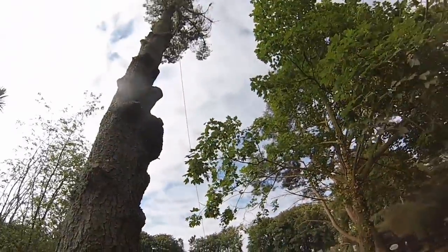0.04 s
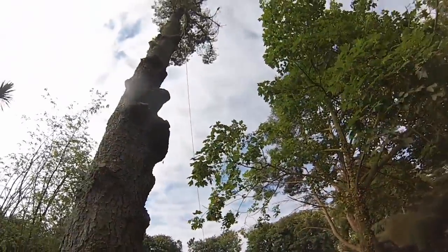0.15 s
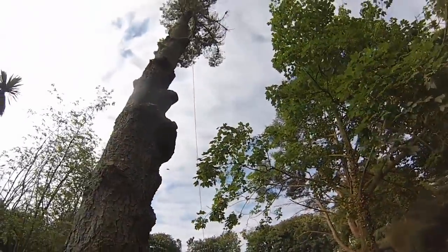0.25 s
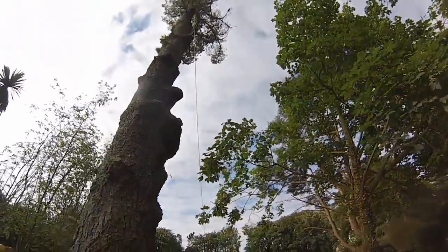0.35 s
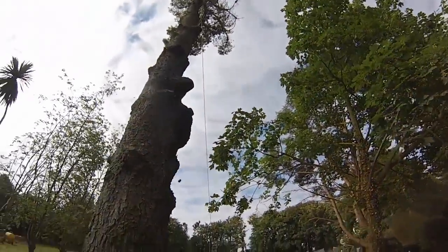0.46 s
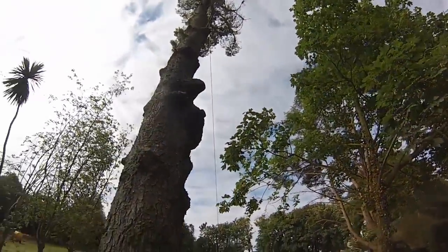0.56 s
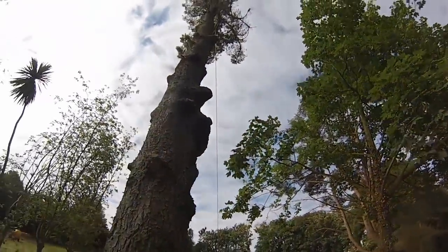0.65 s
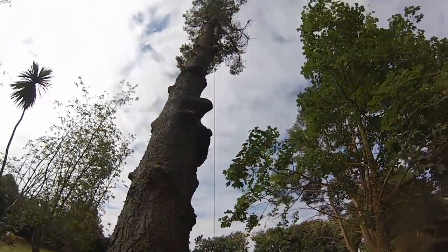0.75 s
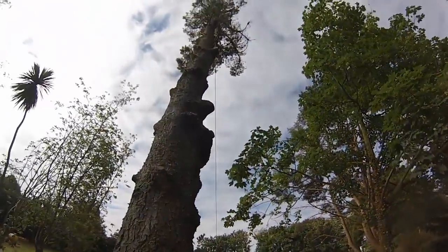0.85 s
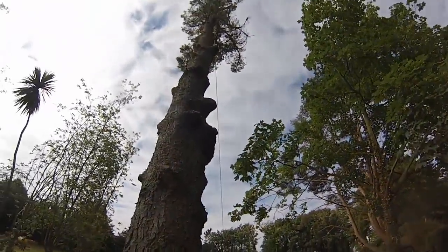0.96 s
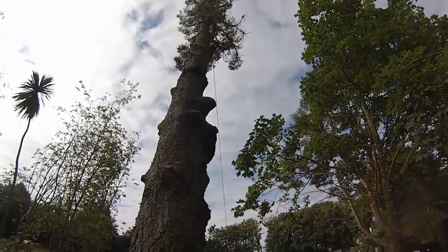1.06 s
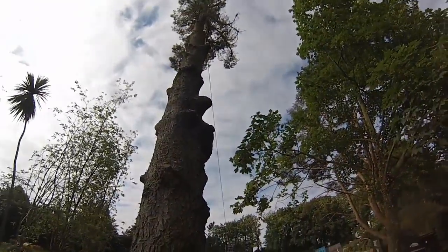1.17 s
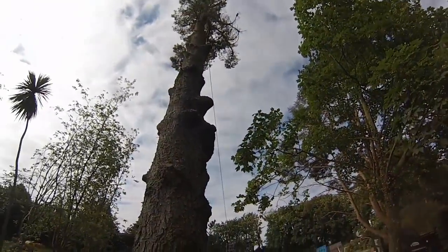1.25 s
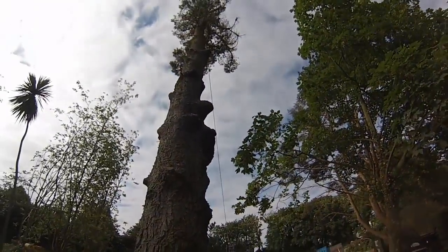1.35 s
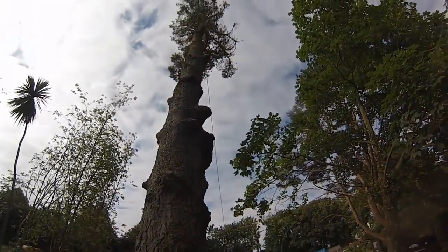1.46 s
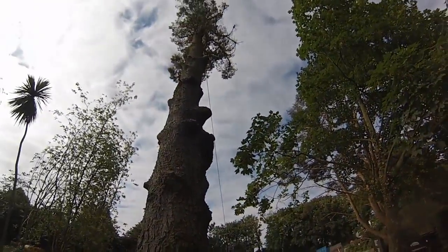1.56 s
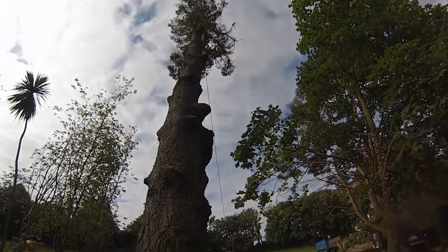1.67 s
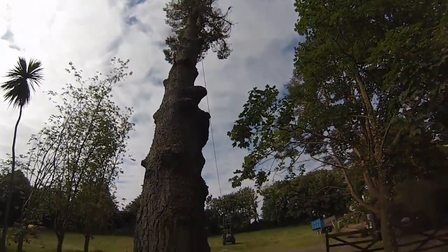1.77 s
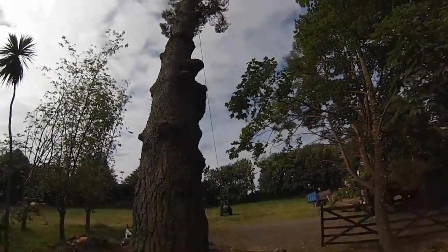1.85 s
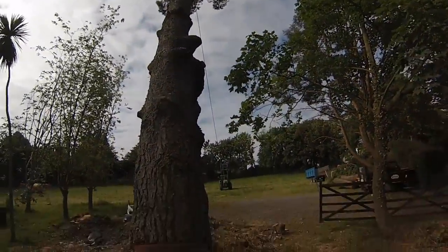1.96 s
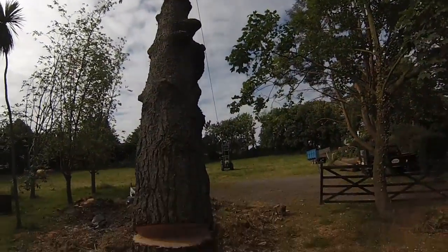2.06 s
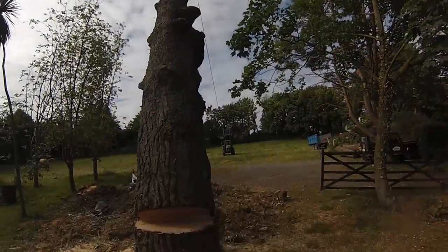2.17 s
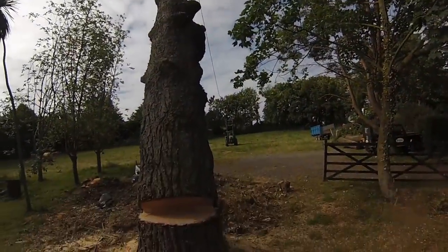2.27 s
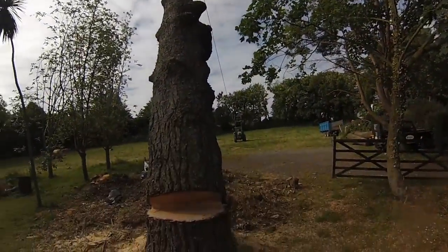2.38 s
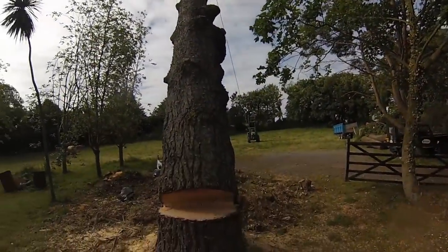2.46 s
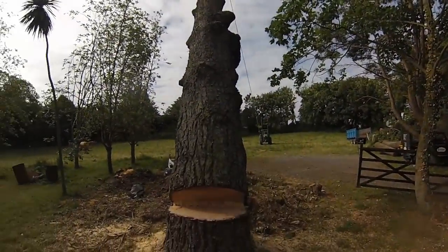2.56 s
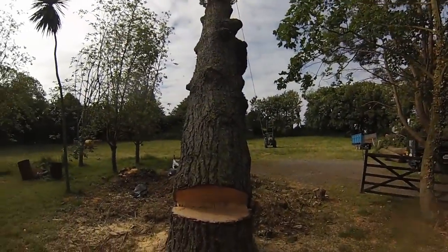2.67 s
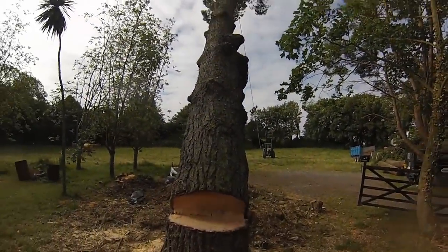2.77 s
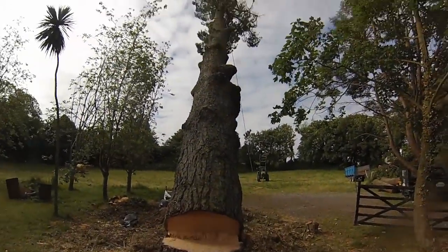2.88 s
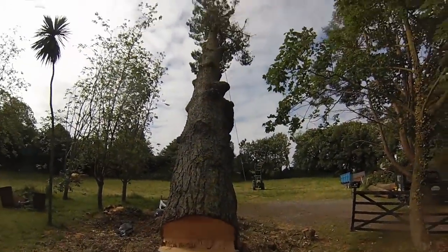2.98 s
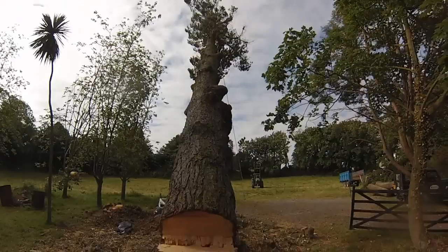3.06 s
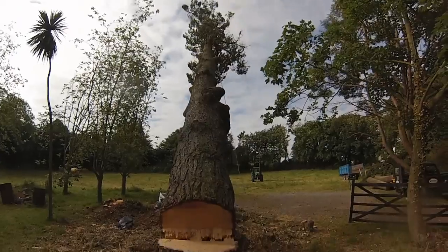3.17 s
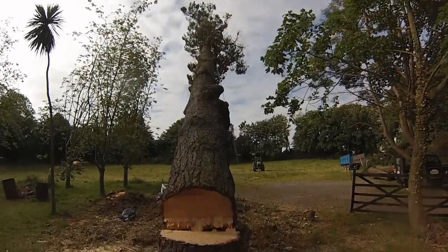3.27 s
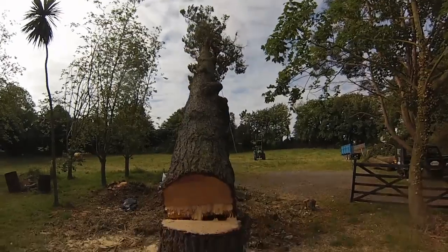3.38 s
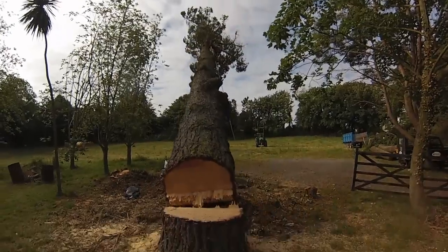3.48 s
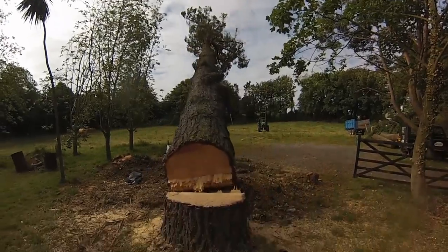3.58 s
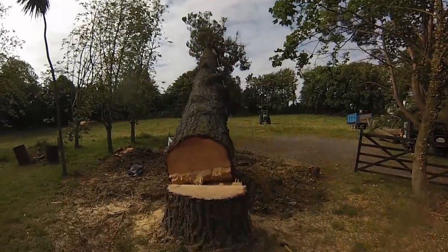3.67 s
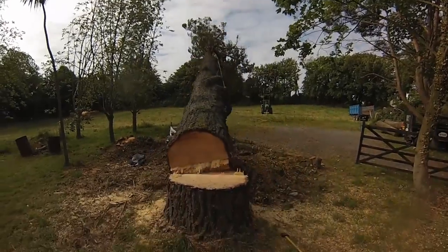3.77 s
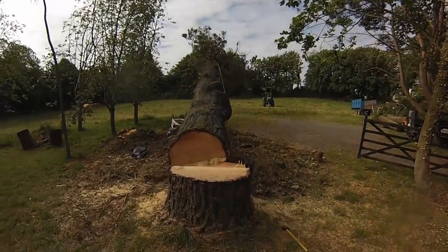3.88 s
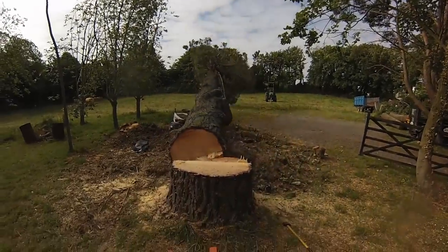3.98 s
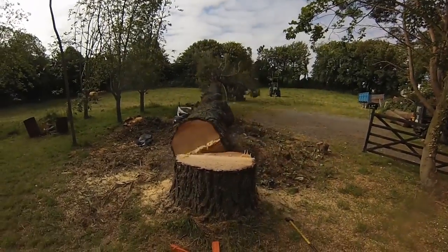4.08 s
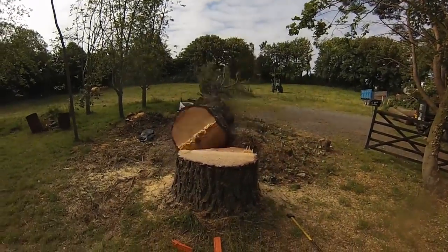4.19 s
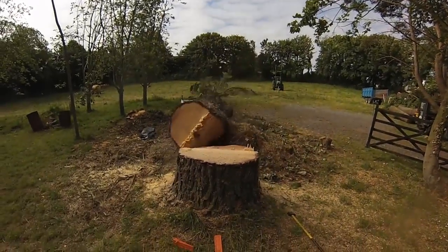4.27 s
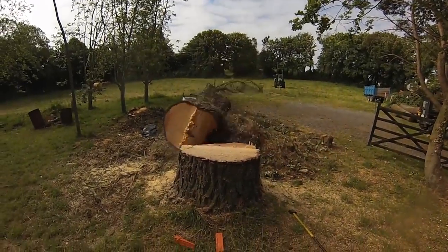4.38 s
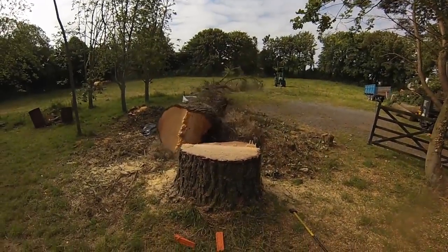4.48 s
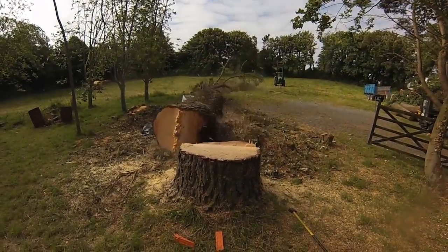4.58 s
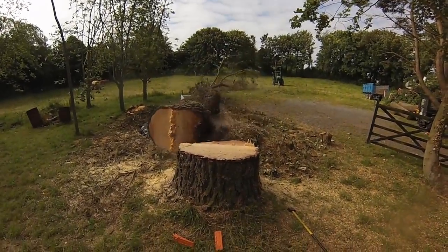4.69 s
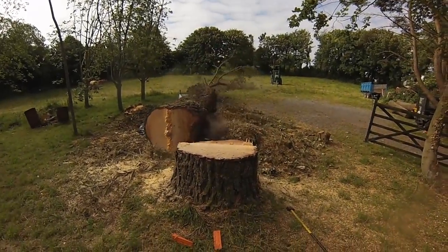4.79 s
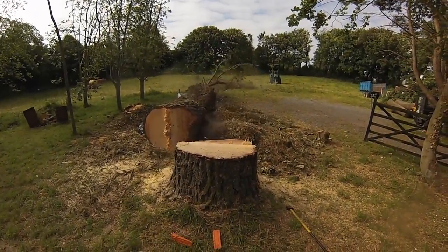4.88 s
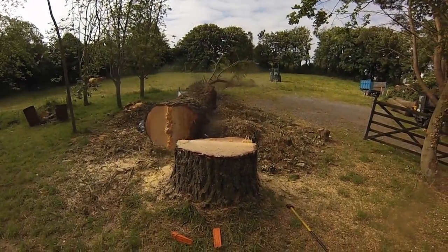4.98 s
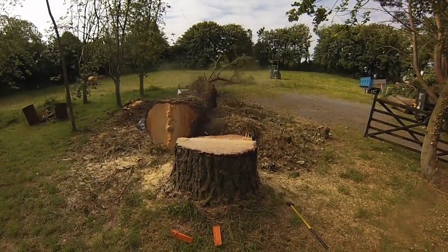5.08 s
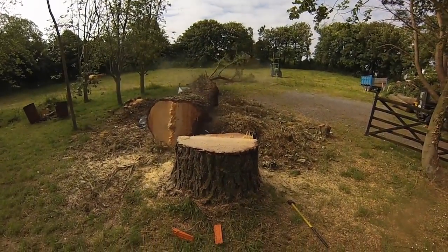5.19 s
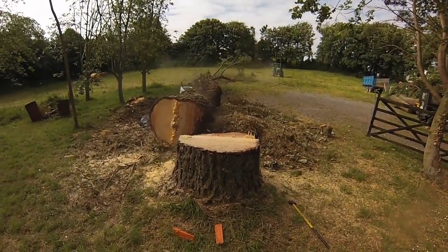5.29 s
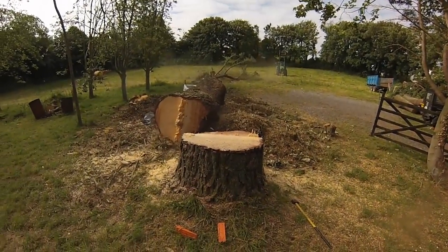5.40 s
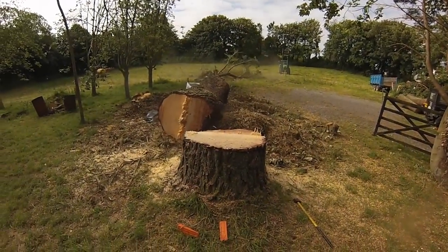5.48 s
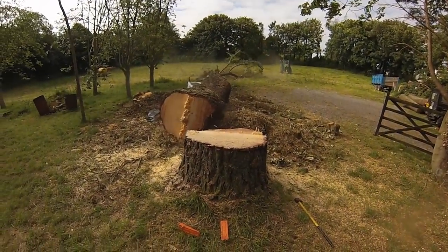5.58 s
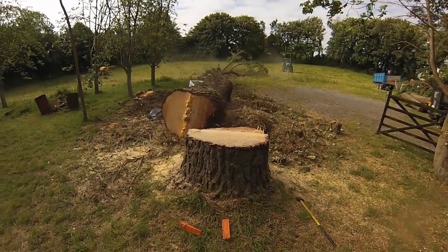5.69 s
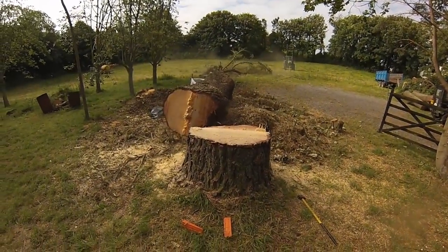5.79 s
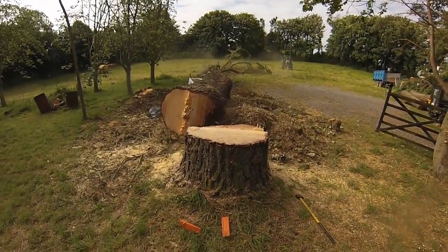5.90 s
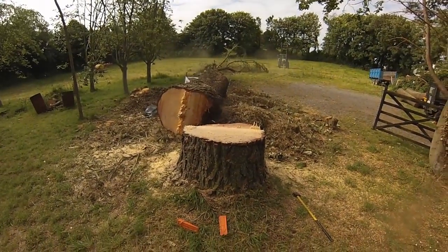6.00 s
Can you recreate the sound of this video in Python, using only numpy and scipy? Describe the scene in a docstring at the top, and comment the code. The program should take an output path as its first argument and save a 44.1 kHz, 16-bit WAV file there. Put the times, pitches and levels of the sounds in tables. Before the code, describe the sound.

Close to a large tree, thick wood cracks from the very start, hollow and sharp, the loudest ones distorting the microphone. Snaps and fibrous tearing crowd together until almost three seconds, each answered by surrounding trees. A far tractor drones, slows and eases off. After a thinner moment the last strands break, then trunk and limbs thud down in a swelling crunch of twigs, settling into faint snaps and a rustle.

```python
"""A tractor pulls steadily far off: wavering firing tones and pulsed clatter, in faint outdoor air (filtered noise).
From the start the hinge of a big conifer snaps and tears: damped knocks, ticks and filtered random grains, with
a few low bumps. The surrounding trees throw each crack back; the loudest clip. The tractor slows, then eases off.
The last strands break at about 3.9 s; trunk and limbs thud down and the crown crushes twigs: swelling grain
noise and knocks. The debris settles with a few faint snaps, and a last bough rustles faintly."""
import sys
import numpy as np
from scipy import signal
from scipy.fft import rfft, irfft, next_fast_len
from scipy.io import wavfile
from scipy.ndimage import uniform_filter1d

SR = 44100
rng = np.random.default_rng(int(sys.argv[2]) if len(sys.argv) > 2 else 0)


def transcribe(u):
    """Save the signal u as a 16-bit wav file named by the first command-line argument.

    u: samples, shape (n,) or (channels, n), limited to [-1, 1]; the rate is SR.
    q: integer samples, one column per channel.
    """
    v = np.clip(np.atleast_2d(u).T, -1, 1)
    q = np.round(v * 32767).astype(np.int16)
    wavfile.write(sys.argv[1], SR, q)


N = 266452
LENGTH = next_fast_len(N + SR)  # a spare second holds the tails
TIME = np.arange(LENGTH) / SR

# Single wood snaps, loud and faint, hinge first, branches last:
# (time [s], knock peak [dB], pitch [Hz], tick re knock before the tick trim [dB], damping [1]: low rings, high is dead)
SNAP_EVENTS = [(-.035, 7.5, 612, -8.5, 1.13), (.021, -28, 1010, 7.5, 1.5),
               (0.3817, -17.5, 686, -11.5, 0.93), (0.5044, -12, 680, -15, 0.97), (.643, 1, 640, -15, 1.11),
               (0.7124, -2, 762, -14.5, 0.87), (0.7507, -12.5, 707, -25, .9), (0.804, -20.5, 922, -28, 1.5),
               (.864, -18.5, 1970, -14.5, 1.5), (1.187, -16, 987, -16.5, 0.81),
               (1.1931, -8.5, 837, -23.5, 0.74), (1.2237, 9.5, 644, -18, 1.3),
               (1.42, -11.5, 1020, -21.5, 0.68), (1.4787, -17, 1314, -15.5, 1.8),
               (1.499, 5.5, 732, -21.5, 0.68), (1.5044, -6, 662, -28.5, 0.69),
               (1.5419, -4.5, 786, -38, 0.83), (1.6576, -17, 931, -18.5, 0.85), (1.7044, -4, 930, -26, 1.2),
               (1.7134, -15, 993, -21, 1.3), (1.788, -16, 1241, -14, 1.4), (1.796, 12.5, 414, -8, 1.54),
               (1.889, -9, 800, -30, 0.87), (1.927, -14, 1197, -15, 1.1), (1.9413, -10, 1192, -26.5, 1.24),
               (2.0403, -15, 988, -10.5, 1.1), (2.0869, -2.5, 665, -24, 1.5),
               (2.1002, 0, 776.4, -29.5, 1.37), (2.195, -10.5, 1198, -9, 0.89),
               (2.258, -9.5, 1009, -14, 1.54), (2.308, -19, 2400, -3, 1.4), (2.3129, -3.5, 1905, -5, 1.5),
               (2.318, -9.5, 1284, -17, 0.78), (2.33, -16, 732, -18, 0.99), (2.3839, 3, 563, -6, 1.9),
               (2.406, -12.5, 1083, -17, 1), (2.4112, -10, 1110, -19, 1.2), (2.4225, 4.5, 990, -19, 1.02),
               (2.451, 8.5, 1327, -10, 0.92), (2.4798, -11.5, 938, -17.5, .7),
               (2.588, 5.5, 345, -12.5, 1.16), (2.634, -19.5, 1021, -15.5, 1.5),
               (2.6655, -16, 807, -16.5, 1.3), (2.68, -9.5, 908, -19, 1.6), (2.707, -13, 721, -14, 1.8),
               (2.764, -4.5, 635, -7, 1.67), (2.8004, -9.5, 890, -7.5, 0.64),
               (2.8066, -9.5, 820, -14, 0.61), (2.8278, 2.5, 685, -14, 1.72),
               (3.3646, -36.5, 1410, -1, 1.2), (3.8435, -18, 1010, -13, 1.1), (3.8559, -13, 725, -7, 0.99),
               (3.8819, -17, 1000, -7, 0.87), (4.178, -24.5, 3630, -19, 0.34),
               (4.883, -40.5, 3500, -10, .6), (5.426, -40.5, 1310, -1.5, 1.1)]
# Low bumps (one a wind or handling bump, one the low thump of overload), then thuds of trunk and limbs:
# (time [s], peak [dB], pitch [Hz])
BUMP_EVENTS = [(.002, -22, 258), (.63, -27.5, 102), (1.798, -25.5, 90), (4.0, -26, 116), (4.096, -23, 142),
               (4.22, -18, 930), (4.263, -25, 483), (4.284, -23, 94), (4.306, -13, 756), (4.334, -11, 247),
               (4.362, -16.5, 330), (4.378, -11, 473), (4.392, -15, 208), (4.401, -12.5, 745),
               (4.651, -26.5, 935), (4.745, -35, 830), (5.141, -40.5, 558)]
# Spells of tearing, hinge then last strands: (full level from [s], hold [s], level before layer trims [dB])
TEAR_SPELLS = [(0.647, 0.14, -39), (1.197, 0.55, -39.5), (1.899, 0.02, -32.5), (1.986, 0.52, -40.5),
               (2.646, 0.19, -34), (3.804, 0.054, -39.5)]
# Engine tones: (multiple of firing rate [1], relative level [dB])
FIRING_ORDERS = [(1, -2), (2, -7), (3, -10), (5, -12.5)]
# Dry tick of a parting fibre: (frequency [Hz], relative level [dB])
TICK_SPECTRUM = [(800, -24), (2450, 10), (4200, -2), (5400, 0), (7200, -16.5), (11000, -26.5), (16000, -50)]
# Fine splintering: (frequency [Hz], relative level [dB])
SPLINTER_SPECTRUM = [(80, -11), (300, 1), (1000, 1.5), (1500, -11.5), (2700, -10.5), (4300, -26.5),
                     (5400, -19.5), (7500, -35.5), (16000, -60)]
# Scatter off stump and ground: (frequency [Hz], relative gain [dB])
SCATTER_SPECTRUM = [(60, -2), (300, -4), (900, 6), (2000, -9)]
# Reflection off the surrounding trees: (frequency [Hz], relative gain [dB])
ECHO_SPECTRUM = [(60, -17.5), (350, -13), (560, -5), (880, 1.5), (1400, -6.5), (5300, -1.5), (8000, -6.5)]
# Rumble of the struck earth: (frequency [Hz], relative level [dB])
GROUND_SPECTRUM = [(20, -29), (40, 5), (95, 15), (145, 0), (260, 3), (470, -7), (900, -43.5)]
# Breaking branches: (frequency [Hz], relative level [dB])
BRANCH_SPECTRUM = [(120, 0), (270, 1), (620, -3), (880, 8.5), (1200, -8.5), (1700, -6), (3500, -44.5),
                   (9000, -49)]
# Crushed twigs and needles: (frequency [Hz], relative level [dB])
NEEDLE_SPECTRUM = [(900, 1), (2300, -6), (3200, -2.5), (4300, -7.5), (5500, -8), (7500, -19),
                   (11000, -23.5), (16000, -45)]
# Outdoor background: (frequency [Hz], relative level [dB])
AIR_SPECTRUM = [(25, 0), (90, -2), (220, -19.5), (550, -24), (1000, -9.5), (1900, -39.5), (5200, -31.5),
                (8500, -46.5)]

AIR_DB, TOP_HZ = -59.5, 15700
# Tractor: firing rate, level before the tone/clatter mix
PULL_HZ, PULL_DB, IDLE_HZ, IDLE_DB = 77.8, -49, 77, -60.5
EASE_OFF_S, EASE_LENGTH_S = 3.5, 1
SAG_HZ_PER_S = 2.4  # labours under load
SPEED_WANDER_RMS, HUM_WAVER_RMS = .023, .5
# Tearing; levels before layer trims
TEAR_ATTACK_S, TEAR_RELEASE_S = 0.0037, 0.048
STRAIN_DB, STRAIN_PEAK_S, STRAIN_DB_PER_S = -56, 1.2, 3  # faint crackle between spells
SPLINTER_DB, SPLINTER_S = -37, 0.03  # fibres keep parting after a crack
# Fall: butt slips off the stump, crown touches, trunk hits, debris at rest
BUTT_DOWN_S, CROWN_DOWN_S, IMPACT_S, AT_REST_S = 3.94, 4.135, 4.384, 5.7
CONTACT_S, SETTLE_DB_PER_S, REST_FADE_S = 0.019, 18, 0.26
SWAY_S, SWAY_LENGTH_S, SWAY_DB = 5.53, 0.046, 8.5  # last bough sinks and rustles
CRUNCH_DB, CRUNCH_S = -13, 0.016  # crunch re bump or thud


def undb(db):
    """Decibels to gain."""
    return 10 ** (np.asarray(db) / 20)


def unit(x):
    """Scale to rms 1."""
    return x / np.sqrt(np.mean(x ** 2))


def ramp(start_s, length_s):
    """Straight rise from 0 to 1."""
    return np.clip((TIME - start_s) / length_s, 0, 1)


def add(track, at_s, sound):
    """Mix a sound in at a time, wrapping at the ends."""
    track[(int(at_s * SR) + np.arange(len(sound))) % LENGTH] += sound


def colour(x, spectrum):
    """Causal minimum-phase filter through (Hz, dB) points, by folding the cepstrum."""
    point_hz, point_db = np.transpose(spectrum)
    hz = np.maximum(np.fft.rfftfreq(len(x), 1 / SR), 1)
    gain_db = np.interp(np.log(hz), np.log(point_hz), point_db)
    cepstrum = irfft(np.log(undb(gain_db)), len(x))
    cepstrum[1:len(x) // 2] *= 2
    cepstrum[len(x) // 2:] = 0
    return irfft(rfft(x) * np.exp(rfft(cepstrum)), len(x))


def walk(rate_hz):
    """Slow random drift, rms 1: random steps smoothed twice."""
    hold = int(SR / rate_hz)
    steps = np.repeat(rng.standard_normal(LENGTH // hold + 1), hold)
    smooth = uniform_filter1d(uniform_filter1d(steps, hold), hold)
    return unit(smooth[:LENGTH])


def grains(rate_hz, spread_db):
    """Tiny fractures at random moments, a few much larger than the rest; rms 1."""
    size = undb(spread_db * np.minimum(rng.exponential(size=LENGTH), 4))
    struck = rng.random(LENGTH) < rate_hz / SR
    return unit(struck * size * rng.choice([-1, 1], LENGTH))


def knock(hz, damping, soft_hz, size=4096):
    """Heavily damped swing, as of wood set free at once, softened above soft_hz; peak 1."""
    f = np.fft.rfftfreq(size, 1 / SR)
    s = 1j * f / hz
    resonance = (damping * s / (1 + damping * s + s * s)) ** 2
    swing = irfft(resonance / (1 + 1j * f / soft_hz) ** 2)
    return -swing / np.abs(swing).max()


def snaps(db, hz, count, damping=0.54, scatter_db=4.5):
    """Single sticks giving way at random moments, each with its own size and pitch, following a level curve."""
    out = np.zeros(LENGTH)
    for when, size, pitch in rng.random((count, 3)):
        at = int(when * N)
        gain = undb(db[at] + scatter_db * (4 * size ** 2 - 2))
        stick_hz = hz * 2 ** (3 * pitch - 1.5)
        add(out, at / SR, gain * knock(stick_hz, damping, 5000))
    return out


def air():
    """Faint outdoor background: filtered noise, gently swelling."""
    noise = colour(rng.standard_normal(LENGTH), AIR_SPECTRUM)
    return unit(noise) * undb(AIR_DB + 0.64 * walk(2.5))


def tractor(tones_db=-3.5, clatter_db=-5.0):
    """Distant diesel: firing tones and clatter pulsing with them; it slows under load, then idles quietly."""
    eased = ramp(EASE_OFF_S, EASE_LENGTH_S)
    pull_hz = (PULL_HZ - SAG_HZ_PER_S * TIME) * (1 + SPEED_WANDER_RMS * walk(4.5))
    firing_hz = pull_hz * (1 - eased) + IDLE_HZ * eased
    db = PULL_DB * (1 - eased) + IDLE_DB * eased
    phase = 2 * np.pi * np.cumsum(firing_hz) / SR
    tones = np.zeros(LENGTH)
    for order, order_db in FIRING_ORDERS:
        waver = 1 + HUM_WAVER_RMS * walk(3.8)
        tones += undb(order_db) * waver * np.sin(order * phase + 2 * np.pi * rng.random())
    pulsed = rng.standard_normal(LENGTH) * (1 + .5 * np.sin(phase))
    clatter = colour(pulsed, [(200, -2), (1000, -8.5), (14000, -44)])
    return undb(db) * (undb(tones_db) * unit(tones) + undb(clatter_db) * unit(clatter))


def reflect(x, response, spectrum):
    """Many small reflections: convolution with a unit-energy response, then coloured."""
    response = colour(response / np.sqrt(np.sum(response ** 2)), spectrum)
    return irfft(rfft(x) * rfft(response), LENGTH)


def clearing(x, near_s=0.0051, near_db=-17, trees_s=0.064, trees_db=-18.5):
    """Stump and ground scatter the sound at once; the trees answer one by one, mostly after 40 ms."""
    scatter = rng.standard_normal(LENGTH) * np.exp(-TIME / near_s) * (TIME > .0015)
    near = reflect(x, scatter, SCATTER_SPECTRUM)
    arrival = np.interp(TIME, [.01, .042, .07, .1], [.09, .13, .7, 1])
    echoes = grains(1500, 2.9) * arrival * np.exp(-TIME / trees_s)
    trees = reflect(x, echoes, ECHO_SPECTRUM)
    return x + undb(near_db) * near + undb(trees_db) * trees


def crash_db(peak_db, swell_db_per_s, fall_db_per_s, settle_db):
    """Level swells as more of the tree meets the ground, drops after impact, lingers as debris settles."""
    before_s, after_s = np.maximum(IMPACT_S - TIME, 0), np.maximum(TIME - IMPACT_S, 0)
    decay = undb(-fall_db_per_s * after_s) + undb(settle_db - SETTLE_DB_PER_S * after_s)
    return peak_db - swell_db_per_s * before_s + 20 * np.log10(decay)


def landing(butt_branch_db=-8, butt_needle_db=-13):
    """Trunk and limbs hit earth, branches break and twigs are crushed; few of them until the crown is down."""
    butt_only = 1 - ramp(CROWN_DOWN_S - CONTACT_S / 2, CONTACT_S)
    rumble_db = crash_db(peak_db=-23.0, swell_db_per_s=61, fall_db_per_s=94, settle_db=-30)
    break_db = crash_db(peak_db=-28.5, swell_db_per_s=31, fall_db_per_s=94, settle_db=-18.5)
    strike_db = crash_db(peak_db=-21, swell_db_per_s=34, fall_db_per_s=160, settle_db=-30)
    crush_db = crash_db(peak_db=-34, swell_db_per_s=33, fall_db_per_s=61.0, settle_db=-16.5)
    break_db += butt_branch_db * butt_only
    strike_db += butt_branch_db * butt_only
    crush_db += butt_needle_db * butt_only
    sway_db = SWAY_DB * np.exp(-((TIME - SWAY_S) / SWAY_LENGTH_S) ** 2)

    ground = unit(colour(grains(700, 2.8), GROUND_SPECTRUM)) * undb(rumble_db)
    branches = unit(colour(grains(1800, 3.9), BRANCH_SPECTRUM))
    branches *= undb(break_db + sway_db + 1.9 * walk(35))
    limbs = snaps(strike_db, 416, count=750, damping=0.58)
    needles = unit(colour(grains(4000, 1.7), NEEDLE_SPECTRUM))
    needles *= undb(crush_db + sway_db + 1.0 * walk(25))
    down = ramp(BUTT_DOWN_S - CONTACT_S / 2, CONTACT_S) * (1 - ramp(AT_REST_S, REST_FADE_S))
    return down * (ground + branches + limbs + needles)


def bumps_and_thuds(damping=0.88, soft_hz=3000):
    """Low bumps early on, then trunk and limb thuds: damped knocks, each with a decaying crunch."""
    knocks, crunch = np.zeros((2, LENGTH))
    for at_s, db, hz in BUMP_EVENTS:
        add(knocks, at_s, undb(db) * knock(hz, damping, soft_hz))
        add(crunch, at_s, undb(db + CRUNCH_DB) * np.exp(-TIME[:SR // 4] / CRUNCH_S))
    return knocks + crunch * unit(colour(grains(2500, 1.4), BRANCH_SPECTRUM))


def tear_db():
    """Spells set in fast, hold and die away; cracks leave splintering; faint strain crackle lies beneath."""
    gain = undb(STRAIN_DB - STRAIN_DB_PER_S * np.abs(TIME - STRAIN_PEAK_S))
    for start_s, hold_s, db in TEAR_SPELLS:
        attack = ramp(start_s - TEAR_ATTACK_S, TEAR_ATTACK_S)
        release = np.exp(-np.maximum(TIME - start_s - hold_s, 0) / TEAR_RELEASE_S)
        gain = np.maximum(gain, undb(db) * attack * release)
    splintering = np.zeros(LENGTH)
    for at_s, db, *_ in SNAP_EVENTS:
        add(splintering, at_s, undb(SPLINTER_DB + min(db, 0)) * np.exp(-TIME[:SR // 4] / SPLINTER_S))
    return 20 * np.log10(np.hypot(gain, splintering))


def tearing(rate_hz=900, spread_db=3.0, level_db=-3.0, snap_db=12, tick_db=-13):
    """Thin fibres part in dense, ragged runs, thicker ones with small snaps and dry ticks."""
    db = tear_db()
    runs_db = 4.23 * walk(110)
    fibres = unit(colour(grains(rate_hz, spread_db), SPLINTER_SPECTRUM)) * undb(db + level_db + runs_db)
    ticks = unit(colour(grains(rate_hz / 2, spread_db), TICK_SPECTRUM)) * undb(db + tick_db + runs_db)
    attached = TIME < BUTT_DOWN_S
    return attached * (fibres + ticks + snaps(db + snap_db, 1350, count=560))


def cracks(soft_hz=5000, tick_db=1, lead_s=0.0027, lead_db=-25, splinter_db=-19,
           jolt_db=-10, jolt_hz=385, jolt_damping=1.0, thinning_db_per_s=4.5):
    """Each fibre bundle crackles briefly, then lets go in a ragged cluster with ticks and a hollow knock."""
    body, ticks, strain = np.zeros((3, LENGTH))
    build_up = np.exp(-TIME[:SR // 20] / lead_s)[::-1]
    all_fibres = rng.random((len(SNAP_EVENTS), 6, 3))
    for (at_s, db, hz, bright_db, damping), fibres in zip(SNAP_EVENTS, all_fibres):
        add(body, at_s, undb(db) * knock(hz, damping, soft_hz))
        add(ticks, at_s, [-undb(db + bright_db)])
        for delay in fibres[:3, 1]:
            add(ticks, at_s + delay * .0035, [undb(db + bright_db) / 3])
        # neighbouring fibres, each at its own pitch; capped level, so a big crack masks them
        fibre_gain = undb(min(db, -10) + 10 + splinter_db)
        for delay, length, size in fibres:
            fibre_s = at_s - .002 + .011 * delay ** 2
            add(body, fibre_s, size * fibre_gain * knock(800 * 4 ** length, .6, soft_hz))
        # hollow recoil of the stump, less as the hinge thins
        recoil_gain = undb(db + jolt_db - thinning_db_per_s * at_s)
        add(body, at_s, recoil_gain * knock(jolt_hz, jolt_damping, soft_hz))
        add(strain, at_s - 1 / 20, undb(min(db, -6)) * build_up)
    tick_peak = np.abs(colour(signal.unit_impulse(SR // 10), TICK_SPECTRUM)).max()
    bright = colour(ticks, TICK_SPECTRUM) / tick_peak
    lead = strain * unit(colour(grains(4000, 1.0), SPLINTER_SPECTRUM))
    return body + undb(tick_db) * bright + undb(lead_db) * lead


def scene():
    """Field, landing and wood; the tearing and all single snaps are echoed by the clearing."""
    field = air() + tractor()
    fall = landing() + bumps_and_thuds()
    wood = clearing(tearing() + cracks())
    return (field + fall + wood)[None, :N]


def record(dry):
    """Overloaded microphone: the loudest cracks clip flat, then the top is cut."""
    clipped = np.clip(dry, -1, 1)
    top_cut = signal.ellip(8, .2, 70, TOP_HZ, fs=SR, output="sos")
    return signal.sosfilt(top_cut, clipped)


dry = scene()
out = record(dry)
transcribe(out)
```